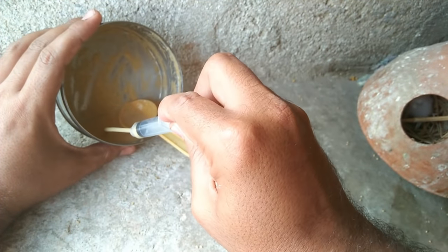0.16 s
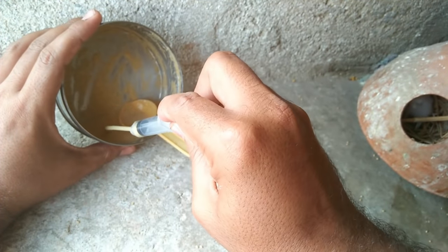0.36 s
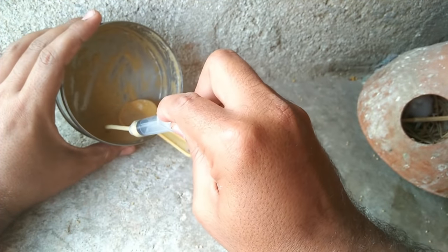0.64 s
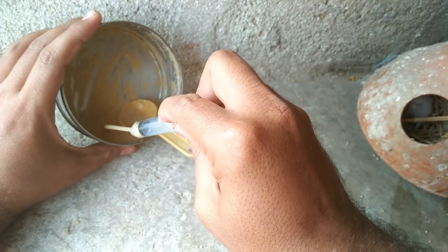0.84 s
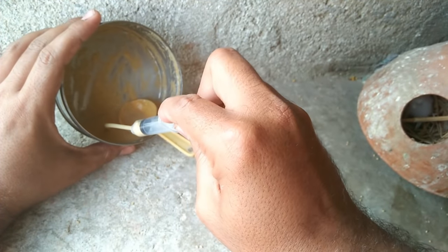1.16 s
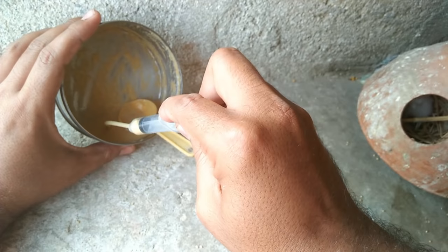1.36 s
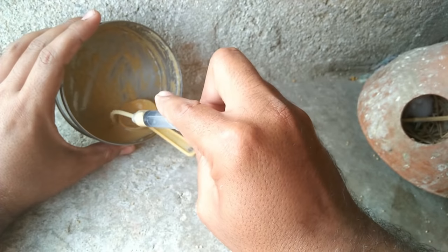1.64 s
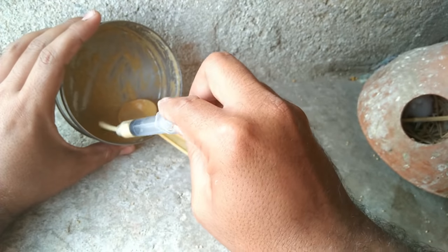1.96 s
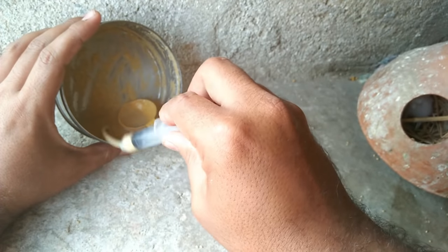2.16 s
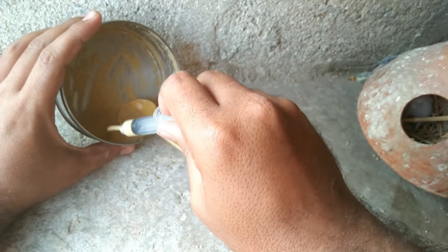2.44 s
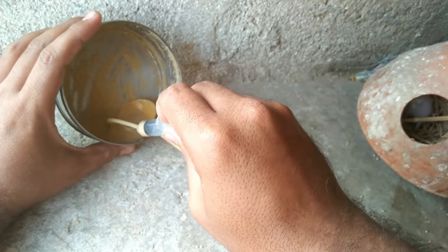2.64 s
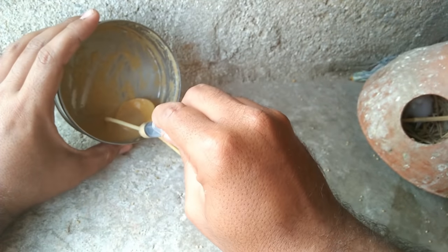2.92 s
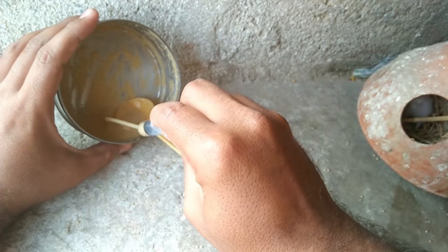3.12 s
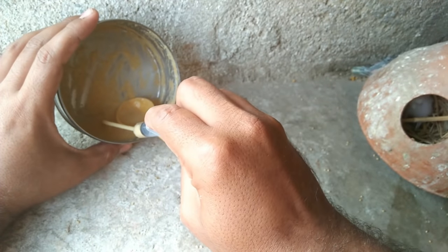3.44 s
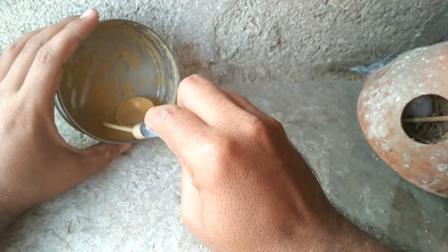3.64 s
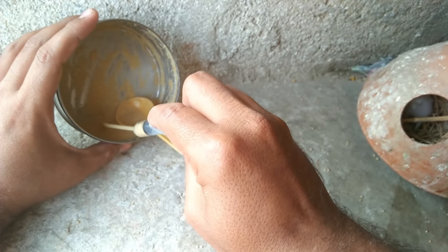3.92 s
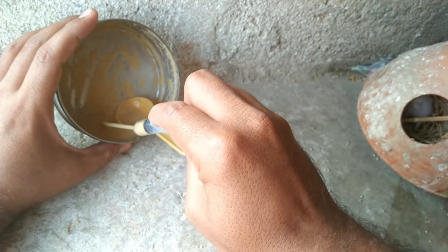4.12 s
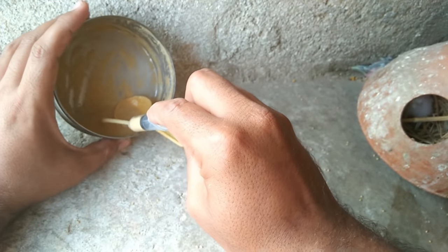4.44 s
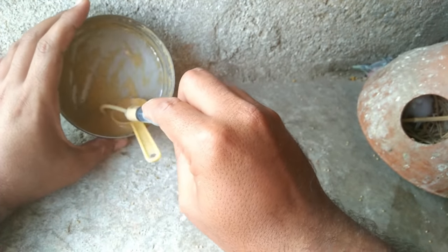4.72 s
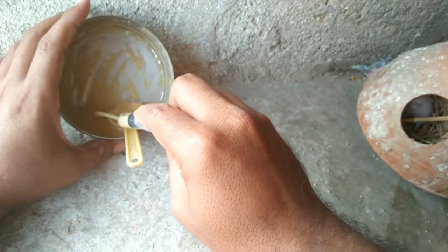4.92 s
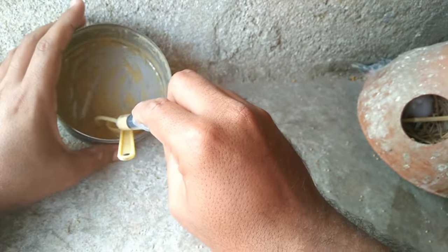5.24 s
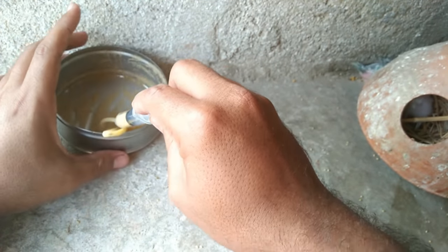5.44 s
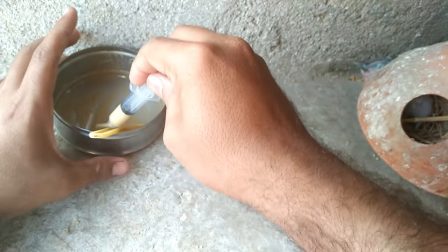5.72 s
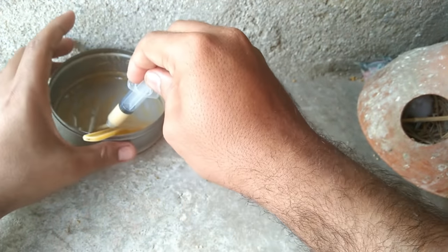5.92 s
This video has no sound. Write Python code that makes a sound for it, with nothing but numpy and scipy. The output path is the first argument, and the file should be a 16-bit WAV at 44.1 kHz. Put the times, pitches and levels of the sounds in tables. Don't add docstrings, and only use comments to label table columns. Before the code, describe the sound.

Several nestlings cheep thinly and hoarsely inside a clay pot, smeared by a small hard room, with faint hollow coos from outside. A loud dry plastic snap comes early on. Late, a spoon knocks a glass jar, which rocks and grinds over grit in quickening hollow clinks, then lands hard on concrete, bounces and is quickly damped by a hand. Close phone microphone; noise suppression makes the airy hiss swell and drop out.

```python
import sys
import numpy as np
from scipy import signal
from scipy.fft import rfft, irfft
from scipy.io import wavfile
from scipy.ndimage import uniform_filter1d

SR = 44100
rng = np.random.default_rng(int(sys.argv[2]) if len(sys.argv) > 2 else 0)


def makeup_ratio(level_db):
    decades = np.asarray(level_db, float) / 20
    return 10 ** decades


def inscribe(sig):
    pcm = np.round(np.clip(np.atleast_2d(sig).T, -1, 1) * 32767)
    wavfile.write(sys.argv[1], SR, pcm.astype(np.int16))


N = 267995
T = np.arange(N) / SR
LANDING_S, GRIP_S = 5.4834, 5.53


def unit_rms(x):
    return x / np.sqrt(np.mean(x ** 2) + 1e-20)


def colour(x, spectrum):
    hz, db = np.transpose(spectrum)
    log_hz = np.log(np.arange(N // 2 + 1) * SR / N + 1)
    return irfft(rfft(x) * makeup_ratio(np.interp(log_hz, np.log(hz), db)), N)


def band(x, low_hz, high_hz):
    return signal.sosfilt(signal.butter(3, [low_hz, high_hz], "band", fs=SR, output="sos"), x)


def drift(rate_hz):
    r = np.exp(-2 * np.pi * rate_hz / SR)
    return unit_rms(signal.lfilter([1], [1, -2 * r, r * r], rng.standard_normal(N + SR))[SR:])


def add(out, start_s, sound):
    a = max(int(start_s * SR), 0)
    out[a:a + len(sound)] += sound[:N - a]


def dying(start_s, db, t60_s):
    return (T > start_s) * makeup_ratio(db - 60 * np.clip(T - start_s, 0, 1) / t60_s)


def hump(centre_s, length_s):
    return np.cos(np.pi * np.clip((T - centre_s) / length_s, -.5, .5)) ** 2


def knock(hz, db, t60_s, contact_s, scatter=1):
    t = T[:SR // 3]
    swell = np.sin(np.pi / 2 * np.clip(t / contact_s, 0, 1)) ** 2
    return makeup_ratio(db - 60 * t / t60_s) * swell * np.sin(2 * np.pi * (hz * t + scatter * rng.random()))


def ring(force, hz, t60_s):
    r, w = makeup_ratio(-60 / (t60_s * SR)), 2 * np.pi * hz / SR
    return signal.lfilter([0, np.sin(w)], [1, -2 * r * np.cos(w), r * r], force + 1e-18)


def gripped(x, start_s):
    return makeup_ratio(-np.clip(T - start_s, 0, .014) * 1800.0) * x


def suppress(x, strength):
    cells = signal.stft(x, nperseg=1024)[2]
    strand = uniform_filter1d(np.abs(cells) ** 2, size=5, axis=1) + 1e-20
    around = uniform_filter1d(strand, size=15, axis=0)
    return unit_rms(signal.istft(cells * np.abs(strand / around) ** strength, nperseg=1024)[1][:N])


# (time [s], level [dB])
STIR = [(0, -65), (.4, -68.5), (.5, -56), (.9, -62.5), (1.02, -63.5), (1.45, -61.5), (1.72, -57),
        (1.9, -61), (2.6, -63), (2.95, -67), (3.15, -61), (3.4, -64), (4.05, -55.5), (4.4, -61),
        (4.75, -60), (4.9, -63.5), (5.4, -65), (6.08, -68.5)]
# (centre [s], length [s], depth [dB])
LULLS = [
    (0.07, 0.17, 22.5),
    (1.811, 0.23, 14.5),
    (2.401, 0.17, 20),
    (2.755, 0.34, 29.5),
    (4.483, 0.2, 11),
    (5.42, 0.15, 9.5),
    (5.825, 0.19, 27.5),
    (6.025, 0.092, 19.5),
]
# (frequency [Hz], density [dB/Hz])
BRIGHT_AIR = [(1000, -7.5), (1500, -4.5), (2200, -6), (3000, 0.5), (4000, -2), (5000, -7), (6000, -6),
              (7000, -3.5), (8500, 1.5), (10000, -2.5), (11500, -14), (13000, -14), (14200, -22.5)]
# (frequency [Hz], density [dB/Hz])
HUM = [(220, -41.5), (380, -5.5), (455, 0), (781, -1), (1040, 5.5), (1320, -20.5), (1400, -30.5),
       (1820, -36.5), (3080, -120)]
# (centre [s], length [s], lift [dB])
FAR_SWELL = (3.38, 0.98, 4.8)
# (frequency [Hz], density [dB/Hz])
RUMBLE = [(15, -41.5), (25, -18), (59, 0.5), (98, -14), (119, -8), (215, -18.5), (292, -9.5), (380, -35.5),
          (490, -58.5), (840, -120)]
# (start [s], length [s], level [dB])
JOGS = [(0.006, 0.1, -58), (0.272, 0.06, -62.5), (0.533, 0.07, -61), (0.714, .08, -66.5),
        (1.433, 0.11, -61), (2.443, 0.066, -62), (4.583, 0.065, -62), (1.786, 0.023, -54),
        (2.614, 0.048, -63), (2.9, 0.022, -78), (3.522, 0.09, -56), (4.674, 0.074, -57.5),
        (5.015, 0.074, -60), (5.19, 0.47, -53), (5.789, 0.17, -57), (5.988, 0.1, -56.5)]


def air():
    stir_db = np.interp(T, *np.transpose(STIR))
    lull_db = sum(db * hump(s, length_s) for s, length_s, db in LULLS)
    white = rng.standard_normal((4, N))
    puff_t60_s = .28

    edges_hz = np.geomspace(2200, 14500, 13)
    patches = np.zeros(N)
    for k in range(12):
        patch_db = 2.2 * drift(24.0) + 2.0 * drift(10.0)
        patches += makeup_ratio(patch_db) * band(white[k % 2], edges_hz[k], edges_hz[k + 1])
    shut_db = -91
    gate = makeup_ratio(stir_db - lull_db + 1.2 * drift(13.0)) + makeup_ratio(shut_db) + dying(LANDING_S, -43, puff_t60_s)
    bright = gate * unit_rms(colour(suppress(patches, .45), BRIGHT_AIR))

    murk = suppress(white[2], .55)
    middle_db = -70.5 + 0.31 * (stir_db - stir_db.mean()) - 0.1956 * lull_db
    middle_gate = makeup_ratio(middle_db + 2.0 * drift(25.0)) + dying(LANDING_S, -40, puff_t60_s)
    middle = middle_gate * unit_rms(band(murk, 1128, 2620))

    swell_s, swell_length_s, swell_db = FAR_SWELL
    hum_db = -74 + swell_db * hump(swell_s, swell_length_s) + 0.78 * drift(12.0)
    hum = makeup_ratio(hum_db) * unit_rms(colour(murk, HUM))

    jogs = sum(makeup_ratio(db - 6.0) * hump(s + length_s / 2, 1.4 * length_s + 0.012) for s, length_s, db in JOGS)
    rumble_gate = makeup_ratio(-75.5 + 4.7 * drift(10.8)) + 0.45 * jogs
    rumble = rumble_gate * unit_rms(colour(white[3], RUMBLE))
    return bright + middle + hum + rumble + jogs * unit_rms(band(white[1], 42, 81))


# (start [s], length [s], pitch [Hz], level [dB])
CHEEPS = [(.004, 0.028, 2408, -63.5), (.004, 0.03, 3720, -64), (0.14, 0.029, 8740, -56),
          (0.287, 0.28, 4020, -66), (0.844, 0.0085, 3890, -43), (0.852, 0.009, 3930, -43.5),
          (0.861, 0.0073, 3960, -46), (1.048, 0.007, 3980, -48), (1.055, 0.0082, 3910, -46.5),
          (1.06, .045, 3870, -57), (1.062, 0.092, 5720, -58.5), (.8, 0.061, 2856, -54),
          (1.429, 0.061, 5620, -51.5), (2.05, 0.082, 3480, -47.5), (2.092, 0.042, 4007, -43.5),
          (2.519, 0.08, 4100, -57), (3.13, 0.1, 3352, -51.5), (3.59, .08, 5490, -51),
          (3.83, 0.17, 3207, -53.5), (3.96, 0.09, 4070, -52), (4.725, .04, 4100, -53.5),
          (.71, 0.046, 4130, -52)]


def cheeps():
    out, wobble = np.zeros(N), drift(36.0)
    for s, length_s, hz, db in CHEEPS:
        a, n = int(s * SR), int(length_s * SR)
        phase = 2 * np.pi * np.cumsum(hz * (1 + 0.0075 * wobble[a:a + n])) / SR
        attack = np.clip(T[:n] / min(0.012, length_s / 5), 0, 1)
        fade = np.cos(np.pi / 2 * T[:n] / length_s)
        add(out, s, makeup_ratio(db) * attack * fade * (np.sin(phase) + makeup_ratio(-17) * np.sin(2 * phase)))
    return out


# (centre [s], length [s], pitch [Hz], level [dB])
DEEP_CHICK = [(0.23, 0.27, 3294, -59), (0.677, .14, 2573, -55.5), (0.863, 0.21, 2850, -54.5),
              (1.019, 0.36, 3536, -57.5), (1.158, .12, 3630, -53), (1.82, 0.13, 3330, -55),
              (2.027, 0.13, 2794, -60), (2.08, 0.068, 3480, -45.5), (2.224, .2, 3703, -49.5),
              (2.28, .16, 2957, -53), (2.882, .2, 3110, -53.5), (3.099, 0.21, 2880, -54),
              (3.181, 0.19, 3407, -50), (3.627, 0.2, 3680, -53), (3.657, .35, 3058, -48),
              (3.794, 0.07, 3710, -44.5), (3.877, 0.17, 3160, -44.5), (3.897, 0.21, 2583, -54.5),
              (4.017, 0.17, 2973, -49.5), (4.107, .1, 3110, -49), (5.675, 0.13, 3035, -54)]
# (centre [s], length [s], pitch [Hz], level [dB], overtone [dB])
RASPING_CHICK = [(0.332, .13, 3890, -52, -6), (0.51, 0.085, 4750, -48.5, -15),
                 (0.693, 0.21, 4054, -60.5, 4.5), (0.858, 0.075, 3990, -57.5, -9),
                 (1.073, 0.062, 3886, -51, -27), (1.371, .17, 4046, -54, -2),
                 (1.416, 0.095, 4770, -58, -16), (1.555, 0.11, 3930, -55, 2),
                 (1.964, 0.23, 3926, -58.5, -3.5), (2.112, 0.076, 4006, -49.5, -7),
                 (2.234, 0.17, 3940, -54, 0), (2.573, 0.18, 4090, -64, 2.5),
                 (3.107, 0.11, 4450, -64.5, 6.5), (3.373, 0.28, 4080, -59, -9),
                 (3.623, 0.13, 4240, -58, -2), (3.734, 0.047, 3960, -50, -23), (3.8, .13, 4350, -44, -8),
                 (3.982, 0.074, 4010, -54, -5), (4.112, 0.076, 4150, -59.5, 8.5),
                 (4.581, 0.11, 4650, -59.5, 3), (4.738, 0.068, 4090, -56.5, 0),
                 (4.91, 0.067, 4370, -52, -2), (5.948, 0.1, 3930, -56, -25)]
# (pitch multiple [ratio], level [dB], warble [share of pitch])
OVERTONES = [(2.14, 1.6, .055), (3.15, -13.5, 0.051)]
# (centre [s], length [s], pitch [Hz], level [dB])
SHRILL_CHICK = [(0.141, 0.1, 5870, -61), (0.771, 0.095, 6300, -50.5), (1.111, 0.11, 5630, -62),
                (1.453, .12, 5510, -50), (1.54, 0.15, 5710, -57), (2.965, 0.1, 6750, -55.5),
                (3.097, 0.065, 6420, -53.5), (3.1, 0.36, 5500, -57.5), (3.318, 0.13, 5100, -50.5),
                (3.458, 0.13, 5720, -61), (3.619, 0.15, 5240, -59), (3.83, 0.15, 6460, -52),
                (4.124, 0.22, 6160, -52), (4.626, 0.052, 5794, -47.5), (4.66, 0.065, 6370, -55),
                (4.762, 0.083, 6170, -44), (4.837, 0.049, 6300, -74)]
# (centre [s], length [s], pitch [Hz], level [dB], rise [share of pitch])
SLIDES = [(0.73, 0.15, 4000, -56, .1), (1.06, 0.28, 2800, -62, .1), (1.67, .11, 3700, -54, -.08),
          (4.585, 0.13, 5060, -55.5, .2), (4.97, 0.22, 4180, -52.5, -.18), (4.969, .13, 4670, -55.5, -.08),
          (5.04, 0.12, 3600, -57.5, -.1), (5.2, 0.22, 3250, -62.5, 0.038), (5.76, .1, 3620, -65, .04),
          (3.05, 0.32, 3150, -60, .16), (1.87, .24, 3500, -56.5, .2), (.55, .25, 2850, -60, -.04),
          (3.1, .14, 2600, -62, -.03), (5.47, .14, 4900, -66.5, 0.0064)]


def chicks():
    deep_warble, rasping_warble, shrill_warble, slide_warble = .052, 0.058, 0.07, .035
    calls = [(*row, deep_warble, 0) for row in DEEP_CHICK]
    calls += [(*row, shrill_warble, 0) for row in SHRILL_CHICK]
    for s, length_s, hz, db, over_db in RASPING_CHICK:
        calls.append((s, length_s, hz, db, rasping_warble, 0))
        for multiple, rel_db, share in OVERTONES:
            calls.append((s, length_s, multiple * hz, db + over_db + rel_db, share, 0))
    calls += [(*row[:4], slide_warble, row[4]) for row in SLIDES]

    out = np.zeros(N)
    warbles = [drift(147.7), drift(60.4)]
    stutter = makeup_ratio(2.2 * drift(32.0))
    for s, length_s, hz, db, share, rise in calls:
        n, a = int(1.15 * length_s * SR), rng.integers(0, N // 2)
        slide = 1 + rise * np.linspace(-.5, .5, n)
        throats = np.zeros(n)
        for warble in warbles:
            throats += np.sin(2 * np.pi * np.cumsum(hz * (slide + share * warble[a:a + n])) / SR)
        swell = signal.windows.tukey(n, .75) * stutter[a:a + n]
        add(out, s - n / SR / 2 - .01, makeup_ratio(db - 7.0) * swell * throats)
    return out


# (time [s], peak [dB], top sizzle [dB], t60 [s])
SNAPS = [(0.2034, -43, -30, 0.049), (1.6395, -8.5, -10, 0.049), (4.0721, -42, -23, 0.06),
         (4.624, -29.5, -7, 0.056), (4.7237, -38, -28, 0.14), (4.7663, -34.5, -13, 0.068),
         (5.3994, -53.5, 0, 0.3), (5.453, -43.5, -25, 0.21), (5.4852, -14, -17.5, 0.031),
         (5.5103, -27, -34.5, 0.072), (5.5478, -33.5, -14, 0.061)]
# (frequency [Hz], density [dB/Hz])
SNAP = [(650, -55), (1060, -22), (1300, -35), (1900, -21.5), (2600, -37), (4000, -29), (6000, -18),
        (7500, -15.5), (8900, -3), (10000, -10), (11500, -13), (13000, -25)]


def snaps():
    body, sizzle = np.zeros((2, N))
    t = T[:SR // 4]
    for s, db, top_db, t60_s in SNAPS:
        decay = makeup_ratio(db - 11.5 - 60 * t / t60_s) * np.clip(t / 0.00141, 0, 1)
        add(body, s, decay)
        add(sizzle, s, decay * makeup_ratio(top_db))
    grains = rng.standard_normal(N) * makeup_ratio(2.0 * drift(400.0))
    return body * unit_rms(colour(grains, SNAP)) + sizzle * unit_rms(band(grains, 11500, 15200))


# (start [s], length [s], start pitch [Hz], end pitch [Hz], level [dB])
COOS = [(0.54, 0.092, 1562, 1360, -62), (0.71, 0.26, 1440, 1440, -72), (0.44, 0.13, 2500, 2800, -68),
        (1.36, 0.13, 1866, 1884, -77), (1.961, 0.15, 688, 745, -76.5), (2.233, 0.067, 724, 770, -62.5),
        (2.29, 0.11, 768, 760, -58), (2.429, 0.2, 768, 800, -67), (2.707, 0.12, 756, 742, -72),
        (2.799, 0.28, 713.5, 720, -66), (2.48, 0.077, 2530, 2160, -71), (3.423, 0.41, 1798, 2010, -64),
        (3.902, 0.18, 1890, 1840, -62.5), (4.651, 0.4, 3250, 3150, -64), (5.128, 0.068, 2720, 2680, -65.5),
        (4.5, 0.179, 3100, 2800, -72), (5.63, 0.167, 4400, 4400, -62.5), (1.279, 0.074, 1150, 1170, -73),
        (1.3, 0.075, 2050, 1900, -75)]


def coos():
    out, wobble, waver = np.zeros(N), drift(99.0), makeup_ratio(3.3 * drift(25.0))
    for s, length_s, start_hz, end_hz, db in COOS:
        a, n = int(s * SR), int(length_s * SR)
        hz = np.linspace(start_hz, end_hz, n) * (1 + .026 * wobble[:n])
        swell = signal.windows.tukey(n, .25) * waver[a // 2:a // 2 + n]
        add(out, s, makeup_ratio(db) * swell * np.sin(2 * np.pi * np.cumsum(hz) / SR))
    return out


# (time [s], rms [dB], low edge
# [Hz], high edge [Hz], t60 [s])
SCUFFS = [(4.576, -46, 380, 1300, 0.07), (5.2, -55, 400, 1000, 0.054), (5.06, -51, 450, 1300, .05),
          (5.235, -53, 400, 1600, .06), (5.293, -56, 450, 1000, 0.098), (5.35, -54, 500, 1600, 0.046),
          (5.397, -54, 500, 1300, .09), (5.435, -48, 600, 1800, 0.052), (5.462, -45, 1200, 2600, .1),
          (5.486, -35, 1800, 3300, 0.07), (5.486, -44, 5800, 7300, .06), (5.51, -49, 3000, 11000, .07),
          (5.538, -51, 6000, 11000, .08), (5.553, -36, 900, 1800, 0.06), (5.59, -43, 900, 1700, 0.11),
          (5.57, -51.5, 350, 520, .2), (5.56, -59, 1200, 2600, 0.59), (5.484, -43.5, 530, 750, 0.078),
          (5.3, -58, 970, 1300, .15), (4.695, -66, 1600, 1800, 0.2), (6.04, -60.5, 990, 2100, .2),
          (4.1, -58, 4400, 5000, .4), (5.07, -65.5, 5800, 6700, 0.5), (5.21, -48, 540, 950, .15),
          (5.565, -64, 5450, 5650, 0.45), (1.664, -57, 1600, 2200, .06), (1.688, -58, 1600, 2300, .05),
          (1.691, -54, 8900, 9900, .03)]


def scuffs():
    out, t = np.zeros(N), T[:SR // 3]
    noise = rng.standard_normal(N) * makeup_ratio(3.5 * drift(150.0))
    for k, (s, db, low_hz, high_hz, t60_s) in enumerate(SCUFFS):
        grit = unit_rms(band(noise[k * 6000:][:len(t)], low_hz, high_hz))
        add(out, s, makeup_ratio(db - 60 * t / t60_s) * np.clip(t / 0.003, 0, 1) * grit)
    return out


# (time [s], peak [dB], low modes [dB], upper twin mode [Hz], contact [s])
KNOCKS = [(4.573, -56, 19, 1150, 0.0027), (4.579, -21.5, -5, 1166, 0.006), (4.628, -36, -18, 1165, 0.0027),
          (4.669, -41.5, 2, 1155, 0.006), (4.689, -45, -11, 1146, 0.0067), (4.892, -56, 1, 1140, 0.017),
          (5.039, -38.5, -3, 1143, 0.01), (5.064, -29.5, -9.5, 1163, 0.004), (5.141, -47, -12, 1160, 0.005),
          (5.204, -30.5, 0.5, 1146, 0.011), (5.232, -36.5, 2.5, 1160, 0.0049),
          (5.24, -26.5, 0, 1146, 0.0055), (5.295, -25, 2.5, 1123, 0.0066), (5.322, -26, -3.5, 1138, 0.0056),
          (5.352, -25.5, -12, 1146, 0.0035), (5.386, -35.5, -8, 1137, .005), (5.4, -21, -6.5, 1106, 0.0054),
          (5.436, -23, -4.5, 1137, 0.0083), (5.467, -15, -7, 1125, 0.0067),
          (5.556, -26.5, -11, 1164, 0.0098), (5.585, -30, -11, 1070, 0.012),
          (5.614, -45.5, -8, 1140, 0.0051)]
# (frequency [Hz], level [dB], t60 [s])
JAR = [(460, -15.5, 0.063), (622, -5, 0.037), (781, 4.5, 0.053), (829, 4.5, 0.088), (1083, 5, 0.17),
       (1440, -19.5, 0.037), (1425, -37.5, 0.02), (1740, -37, 0.0795), (2055, -37, 0.12),
       (2440, -42, 0.046)]


def jar():
    twin_share = 0.63
    low_detune, low_lag = .025, .8
    choke_db, choke_s = 15, 0.0049
    out = np.zeros((2, N))
    next_times = [row[0] for row in KNOCKS[1:]] + [T[-1]]
    for (s, db, low_db, twin_hz, contact_s), next_s in zip(KNOCKS, next_times):
        sound = twin_share * knock(twin_hz, db + 3.5, 0.14, contact_s, scatter=0)
        for hz, mode_db, t60_s in JAR:
            low, twin = hz < 1000, 1000 < hz < 1100
            if low:
                weight = makeup_ratio(low_db)
            else:
                weight = twin_share - 1 if twin else 1
            mode_hz = hz * (1 + low_detune * low * rng.standard_normal())
            level_db = db - 3.0 + mode_db + 2.1 * (not twin) * rng.standard_normal()
            lag_s = contact_s * (1 + low_lag * low)
            sound = sound + weight * knock(mode_hz, level_db, t60_s, lag_s, scatter=not twin)
        choke = makeup_ratio(-choke_db * np.clip((T[:len(sound)] - next_s + s) / choke_s, 0, 1))
        add(out[int(s > GRIP_S)], s - .004, sound * choke)

    rolling = np.max([dying(s, db - 24.5, 0.45) for s, db, *_ in KNOCKS], axis=0)
    grit = rolling * band(rng.standard_normal(N) * makeup_ratio(4.3 * drift(60.0)), 630, 2500)
    grind = sum(makeup_ratio(db - 30.5) * ring(grit, hz, t60_s) for hz, db, t60_s in JAR + [(1160, 0, 0.04)])
    return gripped(out[0], LANDING_S) + out[1] + grind


# (time [s], frequency [Hz], level [dB], t60 [s], contact [s])
PARTIALS = [(4.576, 2370, -49, 0.065, 0.0054), (4.628, 2410, -48, 0.047, 0.0053),
            (5.233, 1440, -48, .1, .012), (5.293, 2067, -53, 0.39, .02), (5.306, 1444, -47.5, 0.3, 0.011),
            (5.344, 1440, -43.5, .12, .01), (5.348, 1760, -58, .15, .01), (5.399, 1420, -49, .12, 0.0085),
            (5.412, 2356, -58.5, .4, 0.016), (5.43, 1420, -41.5, 0.11, .01),
            (5.431, 1740, -55.5, 0.14, .01), (5.457, 1411, -35, 0.13, 0.0074),
            (5.456, 1910, -46.5, 0.1024, .008), (5.486, 2055, -32, 0.12, .004),
            (5.484, 2578, -37.5, 0.078, .004), (5.486, 3496, -50.5, .1, .003),
            (5.485, 5494, -41, .09, .002), (5.486, 4550, -46, .05, .002), (5.611, 1074, -37, .05, .005),
            (5.506, 4450, -49, 0.22, .01), (5.532, 4370, -44.5, 0.082, 0.0073),
            (5.53, 3200, -52.5, 0.14, .008), (5.546, 2000, -43, .12, .006), (5.565, 2840, -61, .2, .008),
            (5.601, 3270, -60, .3, .01)]


def partials():
    out = np.zeros(N)
    for s, hz, db, t60_s, contact_s in PARTIALS:
        add(out, s, knock(hz, db, t60_s, contact_s))
    return out


# (time [s], centre [Hz], level [dB], t60 [s])
THUDS = [
    (5.201, 124.5, -59, 1),
    (5.49, 121.4, -46.5, 0.6),
    (5.5, 332, -57, 0.51),
]


def thuds():
    out, noise = np.zeros(N), rng.standard_normal(N)
    for s, hz, db, t60_s in THUDS:
        envelope = makeup_ratio(db - 60 * np.clip(T - s, 0, 2) / t60_s) * np.clip((T - s) / 0.012, 0, 1)
        out += envelope * unit_rms(band(noise, hz / 1.3, hz * 1.3))
    return out


# (time [s], level [dB], treble tilt [dB/octave])
SET_DOWN = [
    (5.4834, -5, 1),
    (5.547, -35.5, 6),
    (5.556, -22, 0),
    (5.615, -37.5, -1),
    (6.042, -44.5, -7),
    (6.063, -42, -3.5),
]
# (frequency [Hz], level [dB], t60 [s])
STRUCK_JAR = [(1072.5, -1, 0.26), (813, -14.5, 0.11), (1097, 3.5, 0.046), (1434, -4.5, 0.075),
              (1521, -14, 0.15), (1705, -23.5, 0.1), (1943, -25.5, 0.18), (2356, -21, 0.099),
              (3170, -29.5, 0.11), (8040, -28, .04), (5335, -27, .035), (5533, -26.5, 0.11),
              (7660, -29, 0.095), (8970, -33, 0.05)]


def set_down():
    out = np.zeros((2, N))
    for s, blow_db, tilt_db in SET_DOWN:
        late = s > GRIP_S
        for hz, db, t60_s in STRUCK_JAR:
            damping_db = 10.0 * (hz < 1300 and late)
            level_db = db + blow_db + tilt_db * np.log2(hz / 1000) - damping_db
            level_db += 2.7 * rng.standard_normal() * late
            add(out[int(hz > 1300 or late)], s, knock(hz, level_db, t60_s, 9.4 / hz, scatter=late))
    return gripped(out[0], GRIP_S - .001) + out[1]


def room(x):
    t60_s, tail_db, n = 0.37, -3, SR // 2
    tail = unit_rms(rng.standard_normal(n) * makeup_ratio(-60 * T[:n] / t60_s)) / np.sqrt(n)
    return x + makeup_ratio(tail_db) * signal.fftconvolve(x, tail)[:N]


# (frequency [Hz], side minus mid [dB])
SIDE_DB = [(900, -67.5), (2000, -57), (3500, -32), (5000, -28), (6500, -14.5), (8500, -8.5), (11000, -6.5),
           (14500, -14.5)]


def scene():
    hands = jar() + partials() + set_down() + snaps()
    distant = room(chicks() + cheeps() + coos() + makeup_ratio(-21.5) * hands)
    mid = distant + hands + thuds() + air() + scuffs()
    echoes = rng.standard_normal(SR // 20) * makeup_ratio(-60 * T[:SR // 20] / 0.04)
    side = colour(signal.fftconvolve(mid, echoes / np.linalg.norm(echoes))[:N], SIDE_DB)
    return np.array([mid + side, mid - side])


def roll_off(x):
    return signal.sosfilt(signal.butter(12, 15570, fs=SR, output="sos"), x)


def record(dry):
    cutoff_hz = 14400
    low_pass = signal.cheby2(10, 28, cutoff_hz * 1.03, fs=SR, output="sos")
    mix = signal.sosfilt(low_pass, np.tanh(dry))
    return roll_off(mix)


dry = scene()
out = record(dry)
inscribe(out)
```